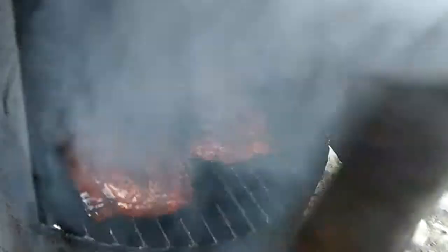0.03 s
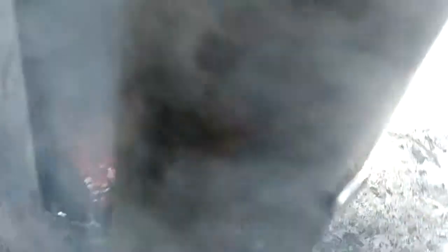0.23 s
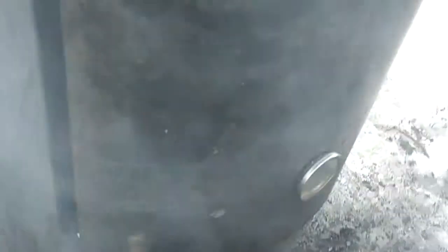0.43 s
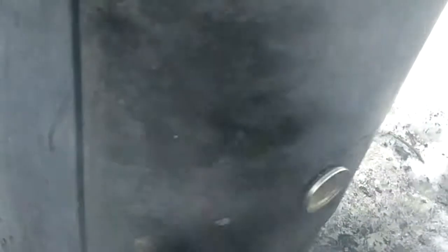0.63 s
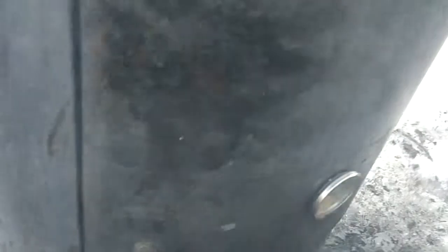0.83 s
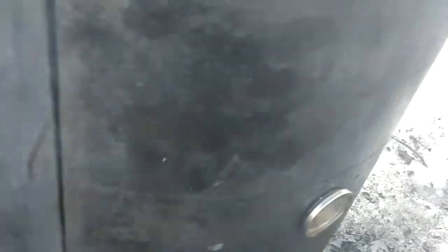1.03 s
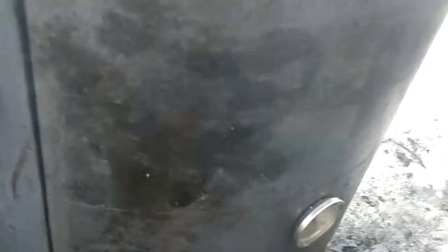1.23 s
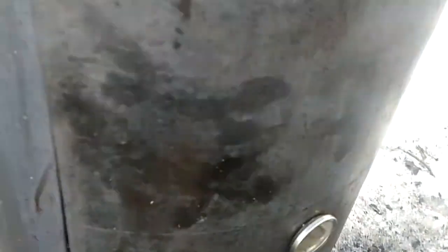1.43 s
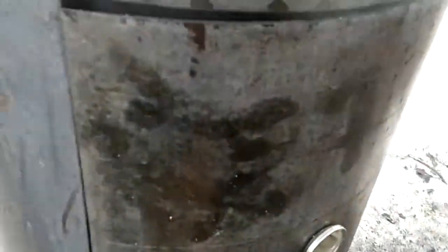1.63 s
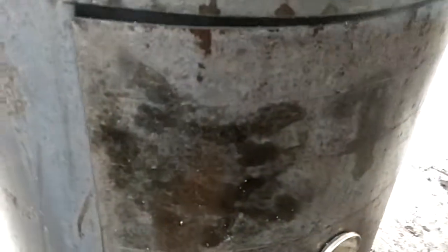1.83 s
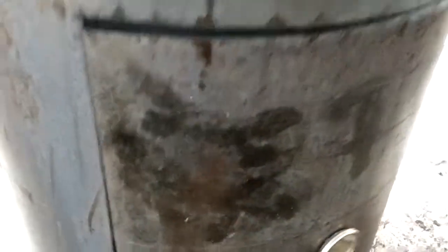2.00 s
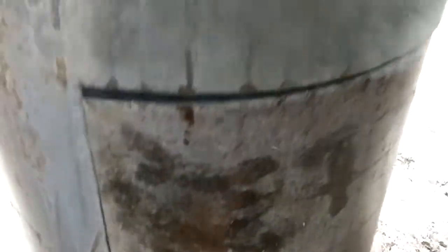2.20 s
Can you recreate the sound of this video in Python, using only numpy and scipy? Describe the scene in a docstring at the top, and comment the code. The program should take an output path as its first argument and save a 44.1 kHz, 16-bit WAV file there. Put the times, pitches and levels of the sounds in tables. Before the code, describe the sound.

A heavy steel smoker lid slams shut outdoors, close up. Quiet air, low hum and a faint draught with soft scuffs open it; weak thuds and a tick follow from 0.5 to 0.97 s. Hollow knocks come at 1.0-1.25 s, then a light scrape. At 1.48 s a loud, overloaded clank hits, bounces once and rings briefly. Dull echo, small rattles, thuds and scuffs fade until about 2.25 s.

```python
"""The heavy steel lid of a smoker is swung shut outdoors, over steady open air and a faint low hum.
First a draught of band-passed noise fades under soft scuffs; ticks, dull thuds and hollow knocks follow,
made of noise puffs, short pressure swings and ringing chamber modes. Steel scrapes in resonant noise and
a brief soft noise leads into the slam, an overloading pulse with a brief clang of noise bands and sines.
The rim bounces once, a dull echo dies away, and the lid settles with rattles, thuds, a tick and scuffs."""
import sys
import numpy as np
from scipy import signal
from scipy.fft import rfft, irfft
from scipy.io import wavfile

SR = 44100
rng = np.random.default_rng(int(sys.argv[2]) if len(sys.argv) > 2 else 0)


def store_wav(level_fs):
    """Save 16-bit WAV to argv[1]."""
    pcm = np.round(np.clip(np.atleast_2d(level_fs), -1, 1) * 32767)
    wavfile.write(sys.argv[1], SR, pcm.T.astype(np.int16))


N = 99621
TIME = np.arange(N) / SR  # seconds
CENTRES = 1000 * 2 ** (np.arange(-15, 13) / 3)  # third-octave centres, Hz

# Crowd of plate and chamber modes in the slam, played as noise.
# Each row: frequency in Hz, third-octave level in dB, hold in seconds, 60 dB decay in seconds.
PLATE_CLANG = [(30, -52, .03, .4), (58.4, -53.5, .03, 0.21), (96, -31, 0.018, .4),
               (140, -42.5, 0.015, 0.55), (215, -27, .03, 0.2), (378.7, -30.5, 0.023, 0.33),
               (550, -28.5, 0.026, .44), (1096.5, -22.5, 0.015, 0.4), (2000, -25, 0.032, 0.32),
               (3200, -19, 0.034, 0.2), (4800, -21.5, 0.015, .19), (7650, -14, .008, 0.19),
               (10500, -15.5, .003, 0.12), (14600, -32, .001, .16)]
# Outstanding modes of the lid. Each row: frequency in Hz, level in dB before the common lift,
# 60 dB decay in seconds, left minus right in dB.
LID_MODES = [(98, -28, 0.45, 0), (206, -27, 0.44, 1), (312, -28, 0.43, -1), (524, -24, 0.41, 2),
             (624, -29, 0.39, -3), (791, -29, 0.37, -6), (869, -30, 0.36, 6), (1134, -23, 0.32, -5),
             (1690, -9, 0.2, -5), (1997, -19, 0.2, 4), (2263, -26, 0.2, 8), (2550, -25, 0.2, 8),
             (2705, -17, 0.2, -8), (3159, -27, 0.2, -8), (3459, -20, 0.2, 6), (3846, -21, 0.19, -1),
             (4501, -33, 0.18, 5), (5471, -24, 0.17, -2), (6611, -13, 0.15, -1), (7391, -23, 0.15, 3),
             (7759, -16, 0.14, -8), (7885, -17, 0.14, 8), (8827, -24, 0.13, 8), (10458, -20, 0.12, 1),
             (12058, -22, 0.11, 8)]
# Colour of the soft noise leading into the slam. Each row: frequency in Hz, third-octave level in dB.
LEAD_IN_COLOUR = [(60, -50), (250, -43.5), (600, -42.5), (1500, -47.5), (4000, -42.5), (7000, -30.5),
                  (10000, -40), (15000, -55)]
# Left-right likeness of the struck steel. Each row: frequency in Hz, correlation from -1 to 1.
STEEL_LIKENESS = [(60, .85), (240, .88), (480, .6), (950, .25), (1900, -.1), (3800, -.1), (7500, 0),
                  (15000, 0)]
# Hollow knocks of the moving lid. Each row: start in seconds, level in dB, pitch in Hz,
# grit trim in dB, tail trim in dB.
LID_KNOCKS = [(0.988, -30, 427, -2, 1.5), (1.1271, -28.5, 427, 2.5, 2), (1.2129, -21.5, 475, -2, -3),
              (1.243, -28, 380, -8, -10.5)]
# Chamber's answer to a knock. Each row: frequency in Hz, third-octave level in dB before trims.
KNOCK_TAIL_COLOUR = [(60, -41), (110, -33), (220, -35), (380, -29), (600, -26.5), (1000, -31.5),
                     (1600, -45), (4000, -54)]
# Grit of a knock. Each row: frequency in Hz, third-octave level in dB before trims.
KNOCK_GRIT_COLOUR = [(500, -72), (1500, -44), (4000, -30.5), (7500, -30), (11000, -47), (15000, -59)]
# Dull bumps. Each row: start in seconds, level in dB, rise in seconds, 60 dB decay of the body in seconds,
# grit trim in dB.
DULL_THUDS = [(.503, -52, 0.014, 0.26, -20), (0.747, -50, .02, 0.33, -8.5), (0.8543, -44, 0.0028, 0.29, -4),
              (0.971, -48.5, 0.0025, 0.26, -2), (1.661, -42.5, 0.0075, 0.047, -15.5),
              (1.873, -53.5, 0.0213, 0.23, 5.5), (1.897, -48, 0.00567, 0.12, -28)]
# Body of a thud. Each row: frequency in Hz, third-octave level in dB before trims.
THUD_COLOUR = [(40, -61), (75, -9), (110, -4.5), (160, -13), (215, -3), (310, -21), (500, -25.5),
               (1000, -20.5), (2000, -36.5)]
# Grit of a thud. Each row: frequency in Hz, third-octave level in dB before trims.
THUD_GRIT_COLOUR = [(500, -17.5), (1300, -24.5), (2700, -11), (4500, -18.5), (7500, -2), (10000, -16.5),
                    (15000, -24)]
# Small sharp contacts. Each row: start in seconds, level in dB, lowest frequency in Hz,
# highest frequency in Hz, 60 dB decay of the fizz in seconds, left minus right in dB.
SHARP_TICKS = [(.283, -49.5, 700, 1560, .025, 1), (0.7656, -37.5, 7000, 10600, 0.0089, -12),
               (1.0722, -39.5, 4800, 8350, 0.0045, 6), (1.0732, -47, 3200, 3600, 0.0086, -4),
               (1.0732, -44, 1560, 1990, 0.011, 2), (1.206, -48.5, 1000, 7900, 0.01, 7),
               (1.8365, -41, 5900, 8380, 0.0085, 2)]
# Soft rubbing strokes. Each row: start in seconds, length in seconds, rise in seconds, fall in seconds,
# treble level in dB, middle level in dB.
SCUFF_STROKES = [(-.1, 0.68, 0.14, 0.42, -61, -71.5), (0.488, 0.34, 0.12, 0.08, -66.5, -69.5),
                 (1.683, 0.072, 0.022, .03, -60.5, -64), (1.928, 0.24, 0.076, 0.053, -58.5, -77.5),
                 (2.146, 0.086, 0.036, 0.039, -55, -74.5)]
# Treble resonance of a scuff. Each row: frequency in Hz, third-octave level in dB before the stroke's level.
SCUFF_TREBLE_COLOUR = [(2500, -34.5), (4500, -20.5), (6000, -10.5), (7300, 7.5), (9000, -11.5),
                       (11000, -21.5), (15000, -13)]
# Middle resonance of a scuff. Each row: frequency in Hz, third-octave level in dB before the stroke's level.
SCUFF_MIDDLE_COLOUR = [(300, -13), (1000, -9), (1400, -14.5), (2000, -0.5), (3300, -2.5), (4600, 2.5),
                       (7000, -12.5), (15000, -30)]
# Rattles of the settling lid. Each row: start in seconds, level in dB, lowest frequency in Hz,
# highest frequency in Hz, 60 dB decay in seconds.
RATTLES = [(1.602, -35, 177, 222, 0.17), (1.625, -39, 730, 1060, 0.17), (1.697, -54.5, 288, 330, 0.99),
           (1.897, -44.5, 84, 140, 0.17)]
# Broad resonances of the scraping steel. Each row: frequency in Hz, width in Hz, relative level in dB.
SCRAPE_RESONANCES = [(1790, 240, -3), (2230, 400, -6), (3150, 450, -2), (4500, 800, -4), (6950, 1100, 3),
                     (8700, 1600, -4)]
# Hollow air modes stirred by bumps. Each row: frequency in Hz, relative level in dB, 60 dB decay in seconds.
CHAMBER_MODES = [(135, -15, .25), (206, -3, .38), (355, -9, .35), (525, -14, .35), (620, -15, .3),
                 (1130, -21, .35)]
# Dull echo from the surroundings. Each row: frequency in Hz, relative third-octave level in dB.
ECHO_COLOUR = [(60, -16.5), (120, -3), (250, -4), (500, -7.5), (950, -1.5), (2000, -12), (4000, -21.5),
               (10000, -39)]
# The fire's draught. Each row: lowest frequency in Hz, highest frequency in Hz, level in dB.
DRAUGHT_BANDS = [(705, 900, -72.5), (1083, 1216, -72)]
# Open air. Each row: frequency in Hz, third-octave level in dB.
AIR_COLOUR = [(30, -91), (50, -77), (72, -70.5), (100, -69.5), (140, -68), (200, -76.5), (400, -78),
              (1000, -75.5), (2000, -78), (4000, -77.5), (7000, -72), (10000, -74.5), (15000, -82)]
# Left-right likeness of the air and handling noises. Each row: frequency in Hz, correlation from -1 to 1.
OPEN_AIR_LIKENESS = [(60, 0.98), (300, .8), (1000, 0.17), (3000, .1), (10000, 0.076)]

SLAM_S = 1.4797
PULSE_HZ, PULSE_T60_S, PULSE_DB = 680, 0.0028, 14
RIGHT_LAG_S = 0.00015  # the right ear hears the pulse and lid modes late
CLANG_DELAY_S, CLANG_ATTACK_S, MODES_LIFT_DB = 0.0011, 0.0006, 2
LEAD_IN_S, LEAD_IN_RISE_S = 0.021, 0.014
BOUNCE_DELAY_S, BOUNCE_DB, BOUNCE_HZ, CLASH_DB, CLASH_T60_S = 0.022, -4, 1000, -15.5, 0.02
ECHO_DB, ECHO_T60_S = -47, 0.9
SCRAPE_START_S, SCRAPE_RISE_S, SCRAPE_DB, SCRAPE_PAN_DB = 1.228, 0.13, -59, -1
KNOCK_T60_S, KNOCK_TAIL_T60_S, KNOCK_GRIT_T60_S = 0.012, 0.35, 0.085
THUD_GRIT_T60_S = 0.19
CHAMBER_KNOCK_DB, CHAMBER_THUD_DB = -28.5, -1  # chamber trim under each kind of bump
TICK_FIZZ = 0.8  # gain of the fizz beside a snap of height 1
DRAUGHT_END_S, DRAUGHT_FADE_S = 0.47, 0.19
HUM_HZ, HUM_DB, HUM_WAVER = 69, -63, 0.1
PEAK_SCATTER_DB, PEAK_SPACING_HZ = 4.5, 38  # uneven strength of crowded modes
LOW_CUT_HZ, TOP_STOP_HZ = 68, 16500


def slam(steel):
    """After a soft lead-in, one pressure pulse seats the lid; plate and chamber modes ring at their own decays."""
    lead_in_shape = envelope(SLAM_S - LEAD_IN_S, LEAD_IN_RISE_S, 0.009, hold=LEAD_IN_S - LEAD_IN_RISE_S)
    lead_in = coloured(steel, LEAD_IN_COLOUR) * lead_in_shape
    pulse = np.array([push(SLAM_S + lag, PULSE_HZ, PULSE_T60_S) for lag in (0, RIGHT_LAG_S)])
    out = lead_in + from_db(PULSE_DB) * pulse
    start = SLAM_S + CLANG_DELAY_S
    for hz, noise in zip(CENTRES, steel):
        level, hold, t60 = [at_hz(PLATE_CLANG, hz, axis=column) for column in (1, 2, 3)]
        out += noise * from_db(level) * envelope(start, CLANG_ATTACK_S, t60, hold=hold)
    for hz, db, t60, pan_db in LID_MODES:
        # Each mode enters at a random moment within the attack.
        arrivals = start + rng.random() * CLANG_ATTACK_S + np.array([0, RIGHT_LAG_S])
        tone = np.array([ring(arrival, hz, t60) for arrival in arrivals])
        out += from_db(db + MODES_LIFT_DB) * pan(pan_db) * tone
    return out


def bounce():
    """The rim lands a second time: a pressure thump and a bright clash of noise."""
    start = SLAM_S + BOUNCE_DELAY_S
    thump = push(start, BOUNCE_HZ, PULSE_T60_S)
    clash = rms_one(band(rng.standard_normal((2, N)), 3300, 9000))
    clash = clash * envelope(start, CLANG_ATTACK_S, CLASH_T60_S)
    return from_db(BOUNCE_DB) * thump + from_db(CLASH_DB) * clash


def settling(handling):
    """The lid shudders in its seat as decaying noise bands while the surroundings echo."""
    echo = coloured(handling, ECHO_COLOUR) * envelope(SLAM_S + 0.0067, 0.034, ECHO_T60_S)
    out = from_db(ECHO_DB) * echo
    for start, db, low, high, t60 in RATTLES:
        rattle = rms_one(band(rng.standard_normal(N), low, high))
        out += from_db(db) * rattle * envelope(start, 0.0083, t60)
    return out


def scrape():
    """Steel slides on steel: noise in broad resonances, swelling and stopping when the lid seats."""
    colour = 0
    for hz, width, db in SCRAPE_RESONANCES:
        mid, side = band(rng.standard_normal((2, N)), hz * 0.75, hz * 1.3)
        rub = mid + side * np.array([[0.5], [-0.5]])
        b, a = signal.iirpeak(hz, hz / width, fs=SR)
        colour = colour + from_db(db) * rms_one(signal.lfilter(b, a, rub))
    swell = np.clip((TIME - SCRAPE_START_S) / SCRAPE_RISE_S, 0, 1) * (TIME < SLAM_S)
    return from_db(SCRAPE_DB) * pan(SCRAPE_PAN_DB) * colour * swell


def knocks(handling):
    """Each knock is a few cycles of the lid, a puff of grit, ringing chamber modes and a hollow tail."""
    tail_noise = coloured(handling, KNOCK_TAIL_COLOUR)
    grit_noise = coloured(handling, KNOCK_GRIT_COLOUR)
    out = 0
    for start, db, hz, grit_db, tail_db in LID_KNOCKS:
        hit = push(start, hz, KNOCK_T60_S)
        hollow = from_db(CHAMBER_KNOCK_DB) * chamber(start)
        tail = from_db(tail_db) * tail_noise * envelope(start, 0.002, KNOCK_TAIL_T60_S)
        grit = from_db(grit_db) * grit_noise * envelope(start, 0.00025, KNOCK_GRIT_T60_S)
        out = out + from_db(db) * (hit + hollow + tail + grit)
    return out


def thuds(handling):
    """Soft, low bumps of noise stir the chamber modes and carry a gritty edge."""
    body_noise = coloured(handling, THUD_COLOUR)
    grit_noise = coloured(handling, THUD_GRIT_COLOUR)
    out = 0
    for start, db, rise, t60, grit_db in DULL_THUDS:
        body = body_noise * envelope(start, rise, t60)
        hollow = from_db(CHAMBER_THUD_DB) * chamber(start + rise / 2)
        grit = from_db(grit_db) * grit_noise * envelope(start, rise, THUD_GRIT_T60_S)
        out = out + from_db(db) * (body + hollow + grit)
    return out


def chamber(start):
    """The air in the chamber rings after a bump, each mode up to 4 ms late."""
    return sum(from_db(db) * ring(start + rng.random() * 0.004, hz, t60) for hz, db, t60 in CHAMBER_MODES)


def ticks():
    """Tiny hard contacts: a band-passed impulse snaps and a short burst of noise fizzes."""
    out = 0
    for start, db, low, high, t60, pan_db in SHARP_TICKS:
        impulse = (np.arange(N) == int(start * SR)).astype(float)
        snap = band(impulse, low, high)
        snap = snap / np.abs(snap).max()
        fizz = rms_one(band(rng.standard_normal((2, N)), low, high)) * envelope(start, 0.00011, t60)
        out = out + from_db(db) * pan(pan_db) * (snap + TICK_FIZZ * fizz)
    return out


def scuffs(handling):
    """Light rubbing swells and fades as noise in two resonant regions."""
    treble = coloured(handling, SCUFF_TREBLE_COLOUR)
    middle = coloured(handling, SCUFF_MIDDLE_COLOUR)
    out = 0
    for start, length, rise, fall, treble_db, middle_db in SCUFF_STROKES:
        swell, fade = (TIME - start) / rise, (start + length - TIME) / fall
        stroke = np.clip(np.minimum(swell, fade), 0, 1)
        out = out + stroke * (from_db(treble_db) * treble + from_db(middle_db) * middle)
    return out


def draught():
    """Air drawn through the open fire chamber, as noise bands fading out as the lid comes over."""
    flow = 0
    for low, high, db in DRAUGHT_BANDS:
        flow = flow + from_db(db) * rms_one(band(rng.standard_normal(N), low, high))
    return flow * np.clip((DRAUGHT_END_S - TIME) / DRAUGHT_FADE_S, 0, 1)


def outdoors():
    """Open air as coloured noise, with a faint hum made to waver by narrow noise around its pitch."""
    air = coloured(noise_bands(OPEN_AIR_LIKENESS), AIR_COLOUR)
    waver = rms_one(band(rng.standard_normal(N), HUM_HZ - 5, HUM_HZ + 5))
    hum = np.sqrt(2) * np.sin(2 * np.pi * HUM_HZ * TIME) + HUM_WAVER * waver
    return air + from_db(HUM_DB) * hum


def push(start, hz, t60):
    """A short pressure swing of about height 1: the slope of a ring eased in, so it moves no net air."""
    eased = ring(start, hz, t60) * np.clip((TIME - start) * hz * 2, 0, 1)
    return np.gradient(eased) * SR / (2 * np.pi * hz)


def ring(start, hz, t60):
    """A struck mode: a decaying sine of height 1."""
    age = np.maximum(TIME - start, 0)
    return np.sin(2 * np.pi * hz * age) * from_db(-60 * np.minimum(age / t60, 4))


def envelope(start, rise, t60, hold=0):
    """Linear rise, hold, exponential decay."""
    age = TIME - start
    return np.clip(age / rise, 0, 1) * from_db(-60 * np.clip((age - rise - hold) / t60, 0, 4))


def peaky_noise(scatter_db):
    """Noise gathered into narrow resonances of random strength, as two stereo pairs."""
    bins = np.arange(N // 2 + 1) * SR / N
    steps = np.arange(0, SR / 2, PEAK_SPACING_HZ)
    strengths = np.clip(rng.standard_normal(len(steps)), -2, 2)
    peaks = from_db(scatter_db * np.interp(bins, steps, strengths))
    return irfft(rfft(rng.standard_normal((2, 2, N))) * peaks, N)


def noise_bands(likeness, scatter_db=0):
    """Third-octave bands of stereo noise, rms 1 each: bands x channels x N."""
    noise, edge, out = peaky_noise(scatter_db), 2 ** (1 / 6), []
    for k, hz in enumerate(CENTRES):
        # Neighbouring bands use different noise.
        mid, side = band(noise[k % 2], hz / edge, hz * edge)
        alike = np.clip(at_hz(likeness, hz), -1, 1)
        stereo = np.sqrt(1 + alike) * mid + np.sqrt(1 - alike) * side * [[1], [-1]]
        out.append(rms_one(stereo))
    return np.array(out)


def coloured(bands, spectrum):
    """Mix noise bands to a spectrum."""
    return np.tensordot(from_db(at_hz(spectrum, CENTRES)), bands, 1)


def at_hz(table, hz, axis=1):
    """Read a column of a table on a log-frequency axis."""
    table = np.array(table)
    return np.interp(np.log(hz), np.log(table[:, 0]), table[:, axis])


def band(x, low_hz, high_hz):
    """Butterworth band-pass."""
    edges = [low_hz, min(high_hz, SR / 2 - 1)]
    return signal.sosfilt(signal.butter(2, edges, "band", fs=SR, output="sos"), x)


def pan(db):
    """Left and right gains for a left-minus-right level difference."""
    return from_db(np.array([[db], [-db]]) / 2)


def rms_one(x):
    """Scale to rms 1."""
    return x / np.sqrt(np.mean(x ** 2) + 1e-20)


def from_db(db):
    """Decibels to gain."""
    return 10 ** (np.asarray(db) / 20)


def scene():
    """The lid, thinned in the bass, and its small noises over the background."""
    steel = noise_bands(STEEL_LIKENESS, PEAK_SCATTER_DB)
    handling = noise_bands(OPEN_AIR_LIKENESS, PEAK_SCATTER_DB)
    lid = slam(steel) + bounce() + settling(handling) + scrape() + knocks(handling) + thuds(handling)
    lid = signal.sosfilt(signal.butter(2, LOW_CUT_HZ, "high", fs=SR, output="sos"), lid)
    return lid + ticks() + scuffs(handling) + draught() + outdoors()


def record(dry):
    """Overload flattens the slam's peaks by soft clipping, and a steep low-pass cuts the top."""
    clipped = dry / (1 + dry ** 8) ** (1 / 8)
    top_cut = signal.cheby2(16, 60, TOP_STOP_HZ, fs=SR, output="sos")
    return signal.sosfilt(top_cut, 0.95 * clipped)


dry = scene()
out = record(dry)
store_wav(out)
```